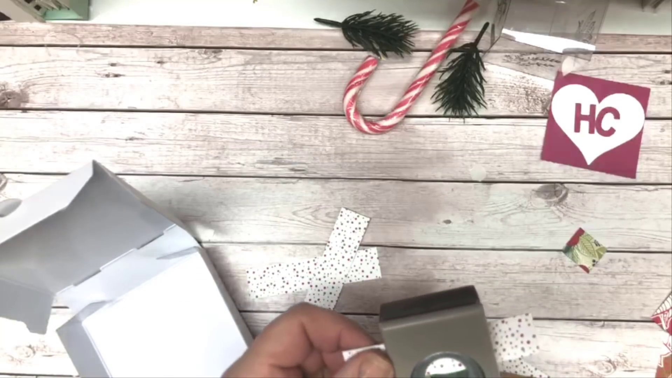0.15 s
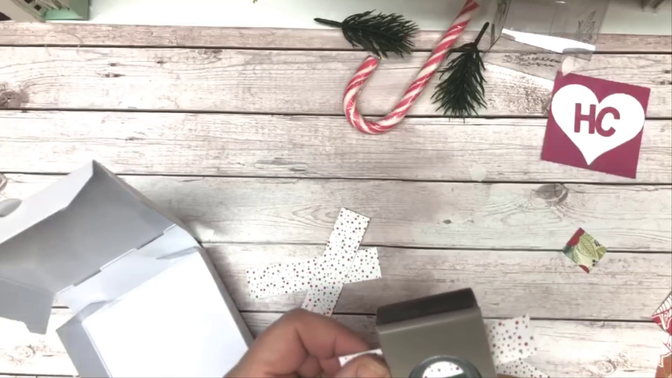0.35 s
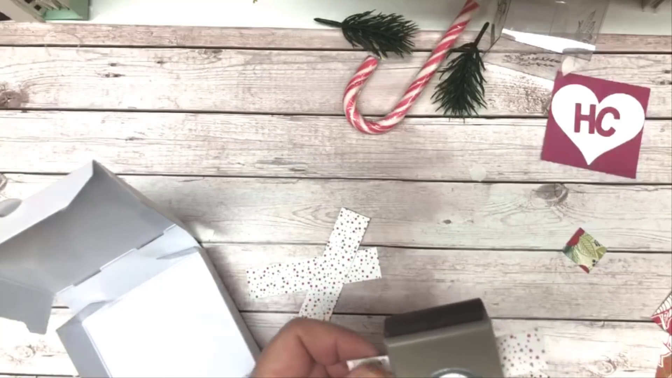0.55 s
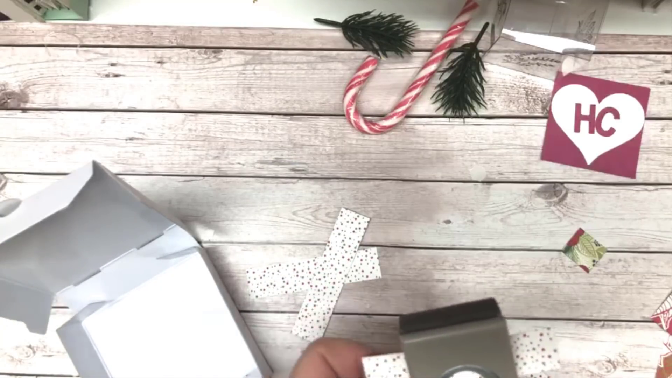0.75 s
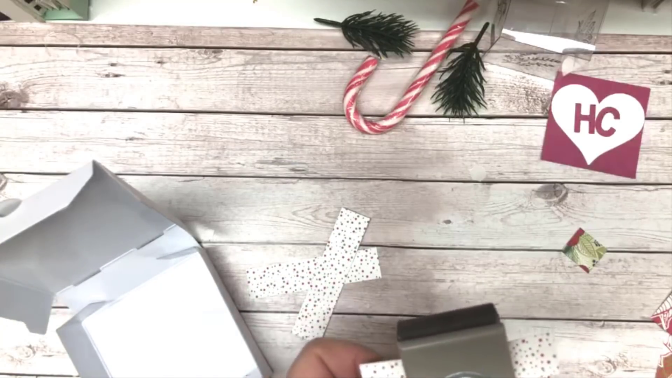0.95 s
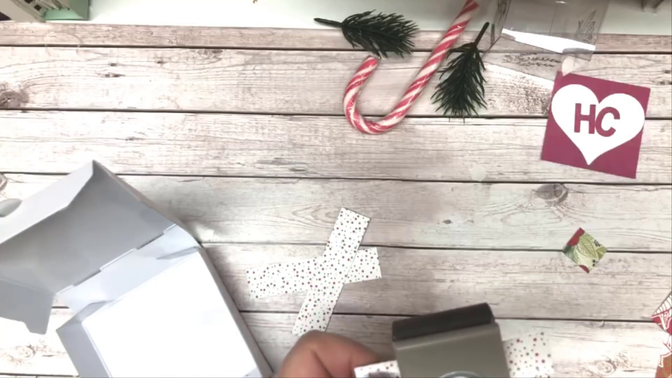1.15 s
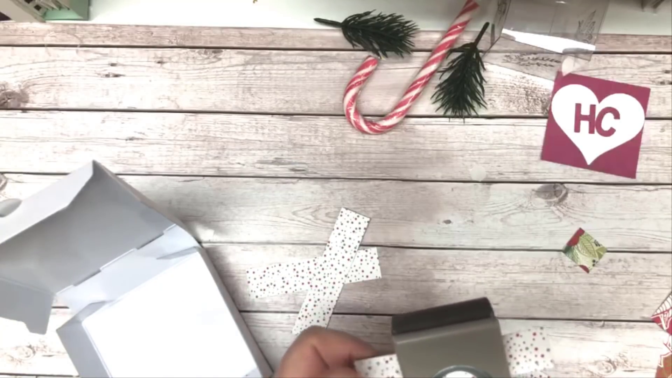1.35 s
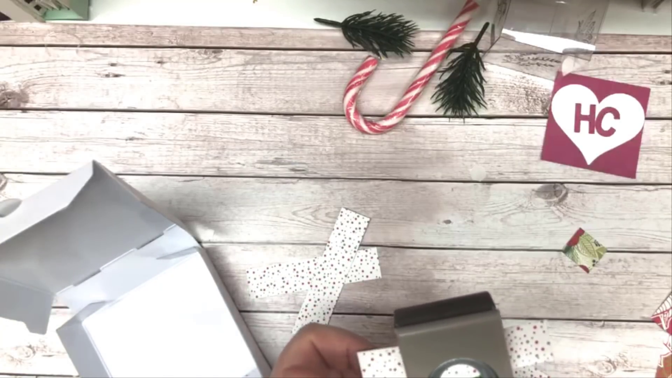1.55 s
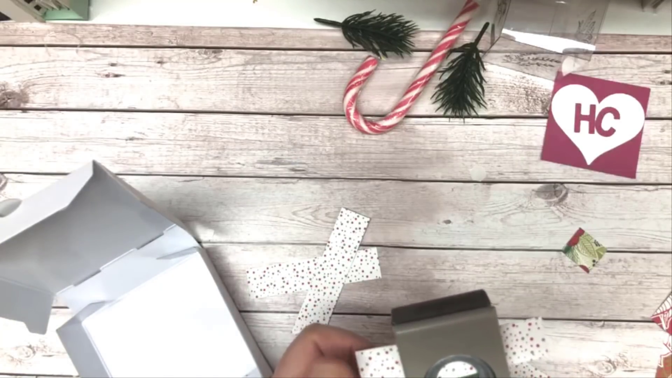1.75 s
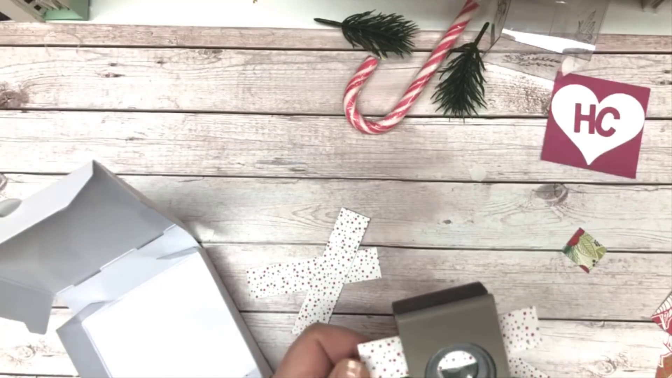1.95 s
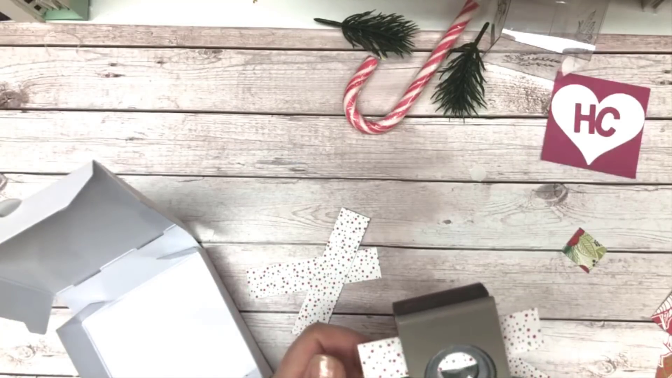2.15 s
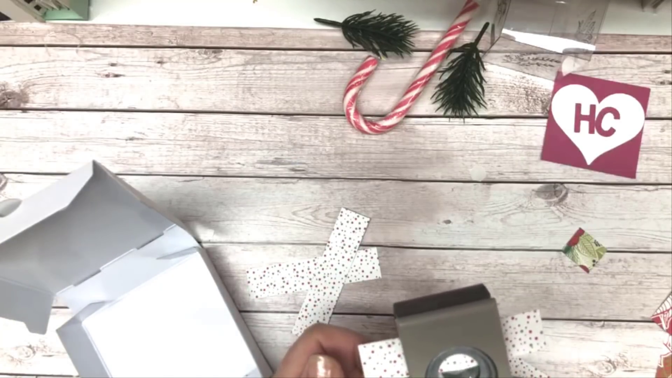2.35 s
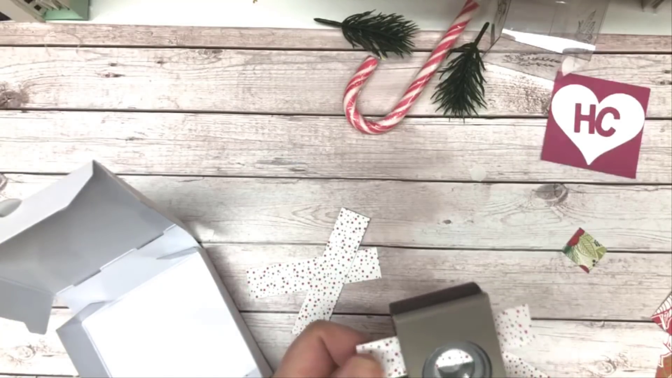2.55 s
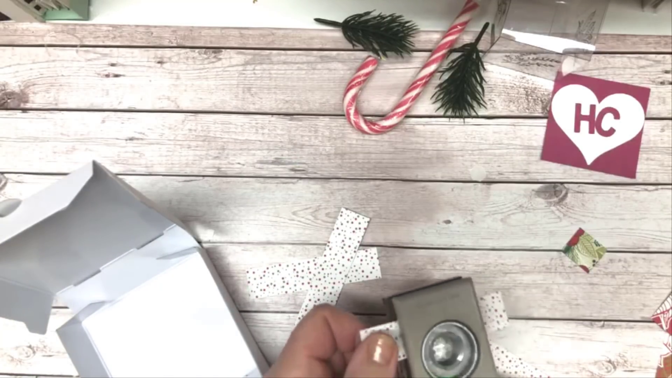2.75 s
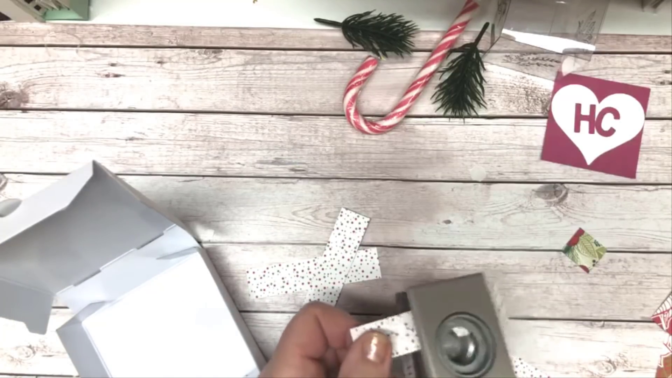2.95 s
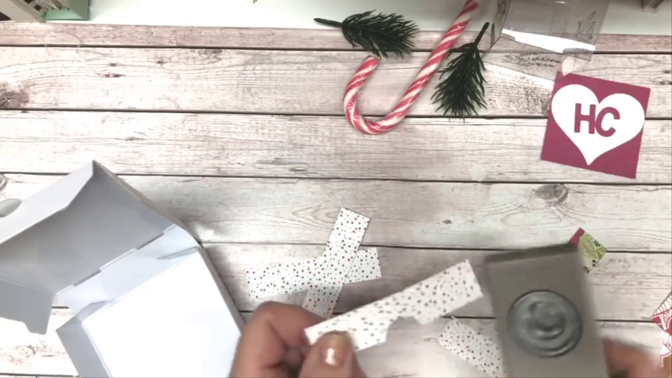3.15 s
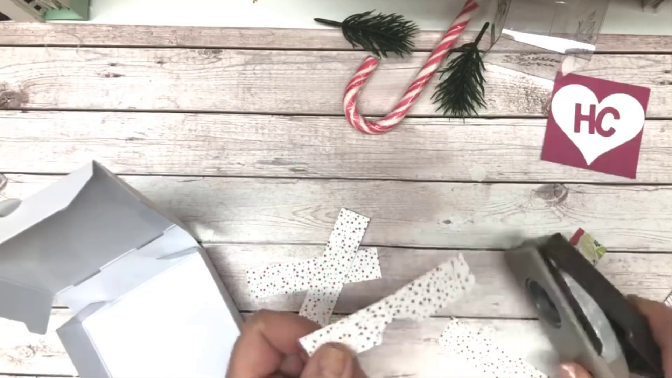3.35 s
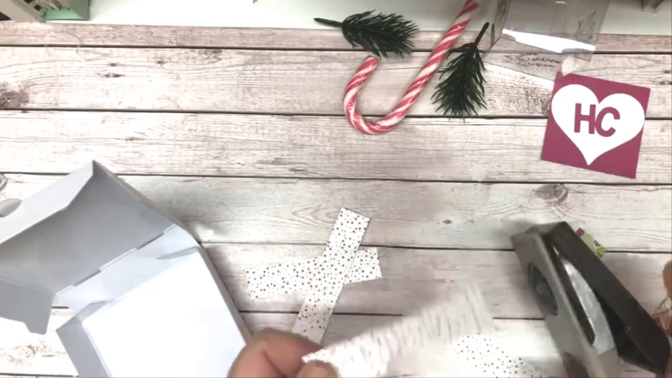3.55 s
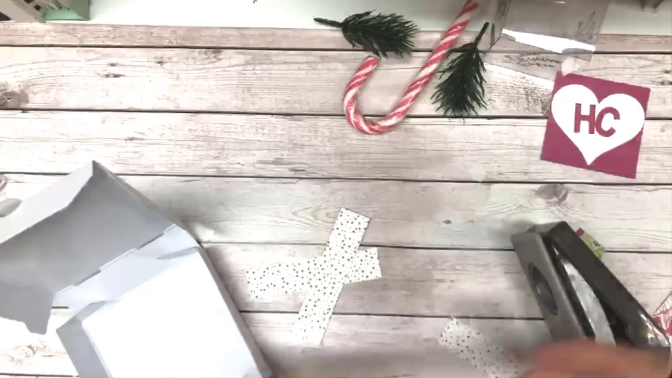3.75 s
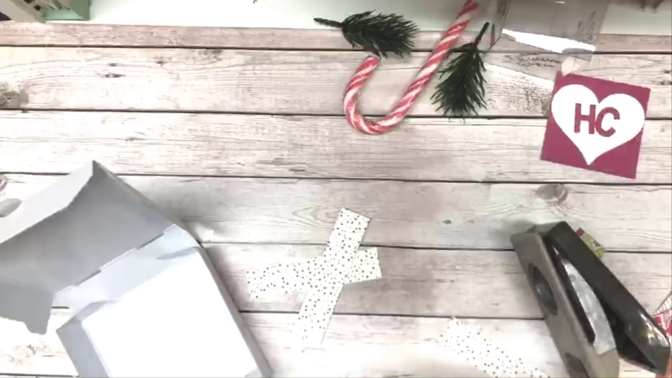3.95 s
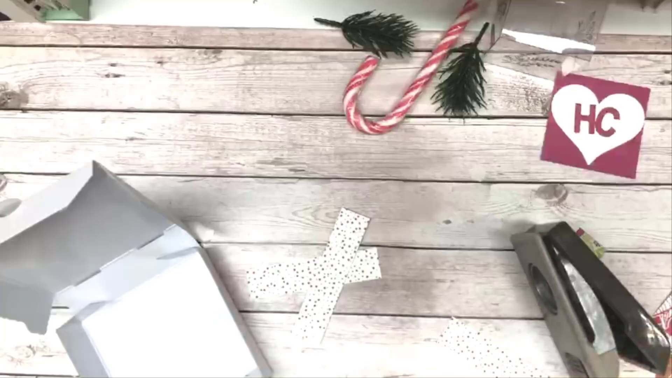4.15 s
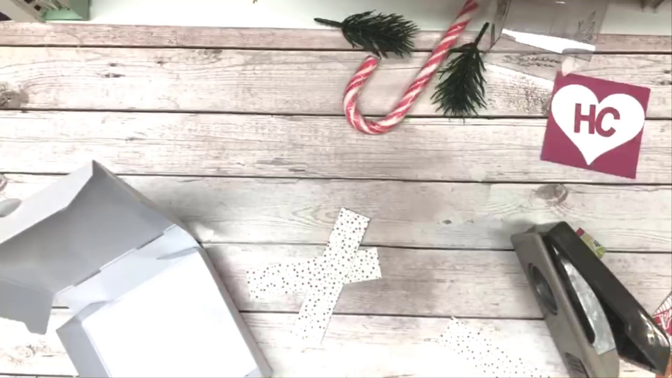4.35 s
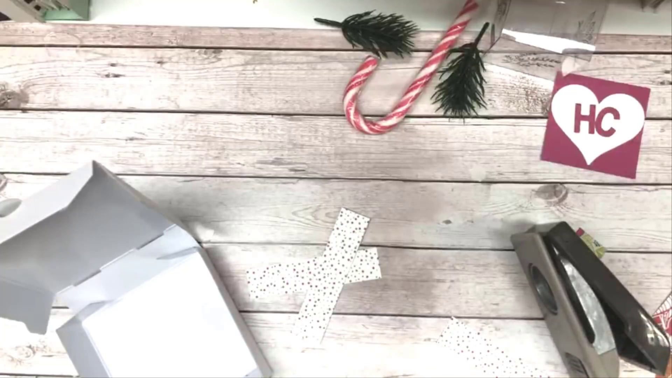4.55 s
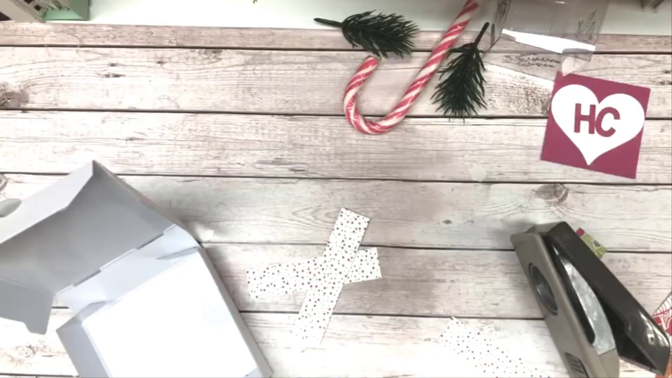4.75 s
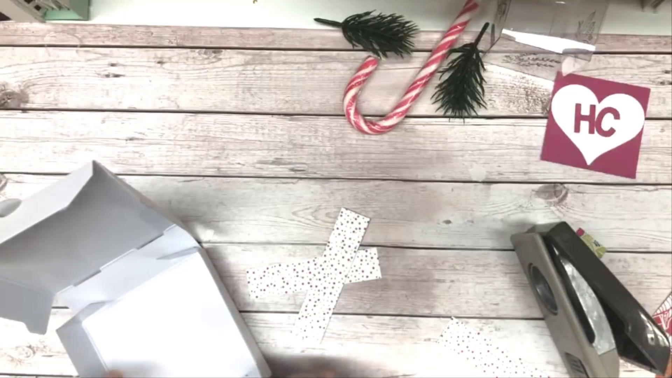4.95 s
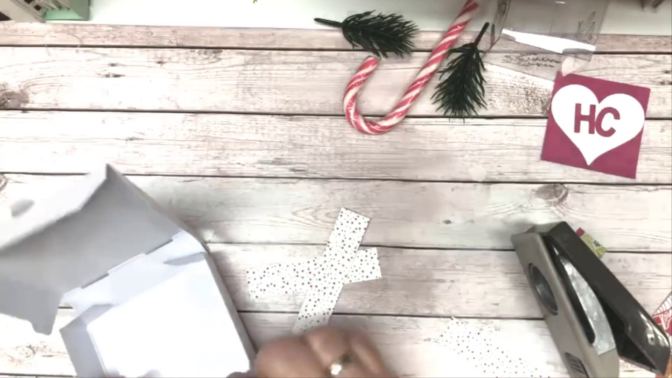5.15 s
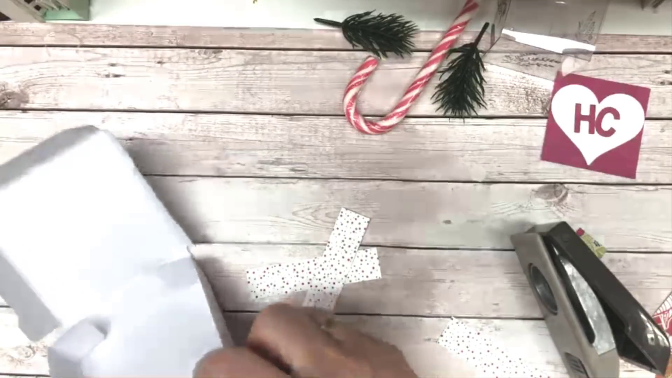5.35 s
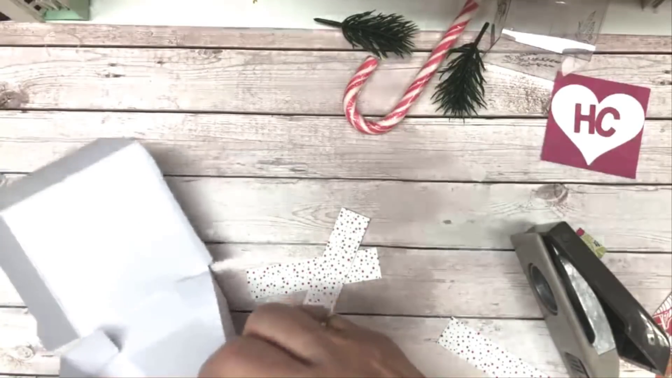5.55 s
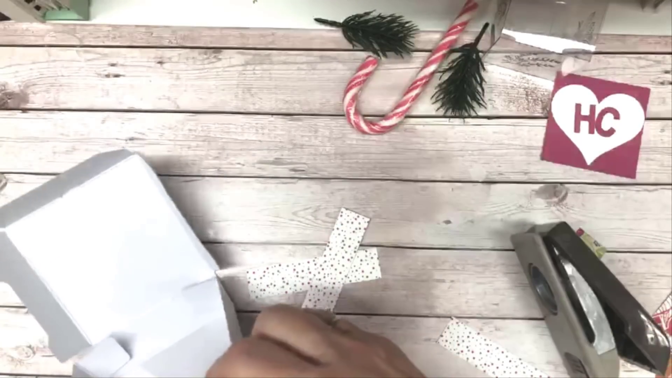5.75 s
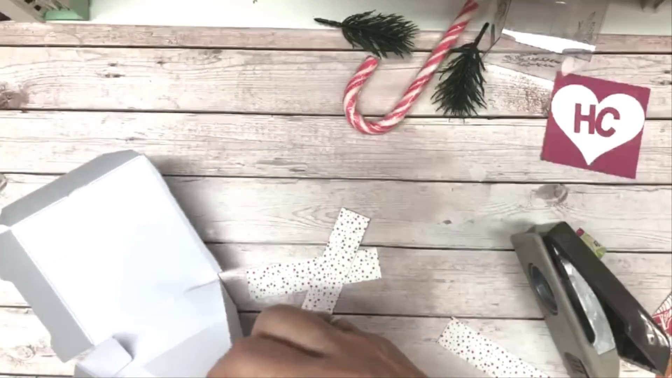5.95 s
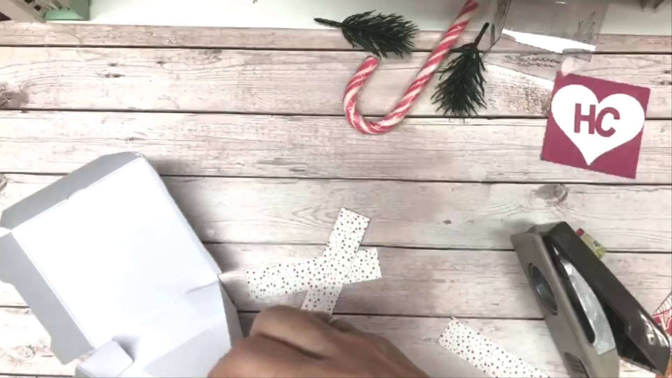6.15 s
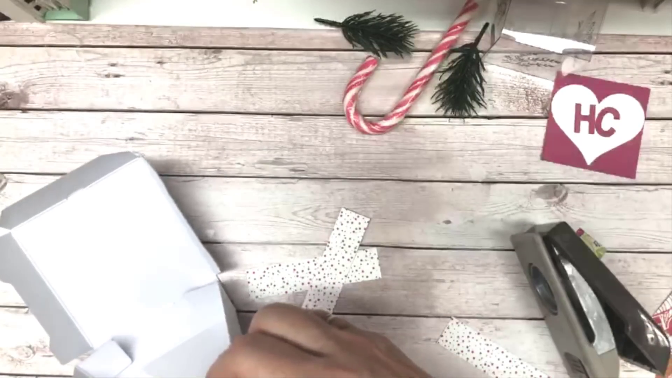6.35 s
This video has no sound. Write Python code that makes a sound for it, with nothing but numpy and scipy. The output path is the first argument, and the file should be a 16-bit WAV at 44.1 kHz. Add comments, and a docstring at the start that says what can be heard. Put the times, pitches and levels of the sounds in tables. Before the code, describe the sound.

Close mono microphone with automatic gain, small room. Low rumble and light hiss, tiny ticks of paper in a metal slot, then a punch clacks, crunches sharply and springs back with brief rattling. A strip is tugged out with dry rasps, and the tool thuds onto a wooden table. Afterwards come quiet fingertip taps, paper brushes and a short cardboard scrape fading into gentle sliding.

```python
"""A craft table in a small room: a hand-held lever punch cuts a paper strip and a cardboard box is moved.
The strip is nudged into the slot, the spring pings, the die bites, snaps through and springs back.
The strip is pulled out, the punch is put down, and the box is slid and turned by hand.
Blows ring decaying modes and noise bursts; rubbing is filtered noise with random slips.
The snap ducks an automatic gain, which creeps back up."""
import sys
import numpy as np
from scipy import signal
from scipy.fft import rfft, irfft
from scipy.io import wavfile
from scipy.ndimage import uniform_filter1d

SR = 44100
rng = np.random.default_rng(int(sys.argv[2]) if len(sys.argv) > 2 else 0)


def store_pcm(level_fs):
    """Save levels as 16-bit WAV."""
    pcm = np.round(np.clip(level_fs, -1, 1) * 32767).astype(np.int16)
    wavfile.write(sys.argv[1], SR, np.atleast_2d(pcm).T)


N = 286560
T_S = np.arange(N) / SR
AGE_S = T_S[:SR // 2]  # time since a blow

# All levels are relative. Spectra give density per Hz; filters are scaled to unit energy.
# Contacts in the punch and ticks of the paper strip:
# (time [s], hollow knock [dB], knock pitch [Hz], frame clack [dB], sharp tick [dB])
PUNCH_AND_STRIP_CONTACTS = [ (0.0205, -57, 1580, -64, -78), (0.605, -49, 1630, -53, -70),
                            (0.622, -76, 1720, -68, -51), (0.654, -59, 1910, -52, -68),
                            (1.1155, -53, 1670, -60, -82), (1.333, -87, 1700, -79, -57.5),
                            (1.501, -80, 1700, -59, -64), (1.8515, -50, 1820, -60.5, -64),
                            (1.8896, -54.5, 1680, -52, -80), (2.128, -36, 1680, -44.5, -68),
                            (2.132, -16, 1685, -33, -39), (2.626, -49.5, 1700, -72, -70),
                            (2.6442, -14, 1670, -26, -21), (2.6481, -21, 1680, -27, -44),
                            (2.6511, -17.5, 1630, -18.5, -32), (2.695, -28, 1430, -49, -53),
                            (2.702, -33, 1444, -48.5, -49), (2.7745, -30.5, 1540, -46, -54),
                            (2.7929, -16.5, 1382, -28, -25.5), (2.797, -41, 1236, -15, -30.5),
                            (2.944, -49, 1740, -49, -67), (2.98, -34.5, 1660, -38, -58),
                            (2.989, -46, 1750, -42, -39), (3.0197, -41.5, 1780, -39.5, -52),
                            (3.064, -51, 1750, -53, -61), (3.1195, -46.5, 1655, -69, -59),
                            (3.2326, -36.5, 1060, -27.5, -53)]
CLACK_T60_S, TICK_T60_S = 0.026, 0.01
KNOCK_SWELL_S = 0.0016
OVERTONE_RATIO, OVERTONE_DB = 1.6, -19  # second mode of the shell
# Punch frame: (frequency [Hz], level [dB], t60 [s])
FRAME_MODES = [(640, -4, .028), (1100, -4, .022), (1400, -8, .035), (1570, -11, .04), (1800, -6, .04),
               (2090, -10, .03), (2730, -8, .035), (3700, -14, .018), (4310, -9, .024), (4630, -11, .02),
               (5260, -7, .015), (5420, -7, .015), (5860, -12, .016), (6900, -17, .015)]
# Noise of a frame clack: (frequency [Hz], density [dB])
CLACK_SPECTRUM = [(100, -18), (350, -9), (600, -2), (850, -5), (1150, 2), (2600, 1), (3200, -3), (4400, -4),
                  (5400, -1), (7500, -14), (15500, -22)]
# Noise of a sharp tick: (frequency [Hz], density [dB])
TICK_SPECTRUM = [(100, -1), (700, 1), (3000, -2), (6000, -5), (8500, -11), (11500, -7), (14500, -3),
                 (16000, -6)]
# Spring slipping on its seat: (time [s], level [dB])
SPRING_SLIPS = [(1.8512, -51), (2.1325, -71), (2.6145, -66), (2.625, -61.5)]
# Spring: (frequency [Hz], level [dB], t60 [s])
SPRING_MODES = [(1640, -9, .05), (1960, -2, .06), (2595, 4, .05), (3800, -12, .06), (4323, -5, .085),
                (5066, -1, .22), (7111, -19, .1)]
# Lever hitting its stop: (time [s], level [dB])
LEVER_HITS = [(2.7972, -23), (3.2316, -34.5)]
# Lever: (frequency [Hz], level [dB], t60 [s])
LEVER_MODES = [(570, -15, .025), (980, -9, .03), (1265, 0, .055), (2449, -1, .035), (3461, -8, .03),
               (3984, -11, .03), (4700, -9, .02), (5582, -13, .02)]
# Squeezes that make the hinge creak: (peak time [s], rise [s], fall [s], level [dB])
HINGE_SQUEEZES = [(2.03, .1, .05, -77.5), (2.12, .06, .03, -71.5), (2.632, .025, .03, -59),
                  (2.965, 0.017, 0.021, -47)]
# Hinge creak: (frequency [Hz], density [dB])
HINGE_SPECTRUM = [(800, -30), (1700, -13), (2250, -19), (2620, 0), (3000, -20), (4400, -21), (9000, -38)]
# Loose parts rattling: (peak time [s], rise [s], fall [s], level [dB])
RATTLE_SPELLS = [(2.66, 0.011, 0.056, -47.5), (2.693, 0.016, 0.052, -46), (2.78, .05, 0.0155, -50.5),
                 (2.965, 0.022, 0.03, -55.5), (3.52, 0.11, 0.076, -59.5), (3.57, 0.018, 0.022, -53)]
RATTLE_PER_S, RATTLE_KNOCK_DB, RATTLE_KNOCK_HZ = 590, 2, 1520

# Strip sliding over the fingers as it is fed in: (peak time [s], rise [s], fall [s], level [dB])
STRIP_FEEDS = [(.56, 0.29, 0.27, -71), (1.22, 0.31, 0.42, -72)]
# Nudges of the strip in the slot: (peak time [s], rise [s], fall [s], level [dB])
STRIP_NUDGES = [(.05, .06, 0.065, -78), (.608, 0.026, 0.025, -57), (.94, 0.15, 0.19, -74),
                (1.11, 0.027, 0.044, -65.5), (1.27, 0.08, 0.078, -78), (1.49, 0.044, 0.065, -76)]
# Tugs that draw the strip out: (peak time [s], rise [s], fall [s], level [dB])
STRIP_TUGS = [(2.98, 0.093, 0.23, -59.5), (3.115, 0.029, 0.082, -59.5), (3.21, 0.052, 0.11, -56.5),
              (3.31, 0.042, 0.044, -69.5)]
TUG_SHELL_DB, TUG_EDGE_DB = -4, -7.5  # shell and paper edge, against the strip
# Strip on the fingers: (frequency [Hz], density [dB])
FEED_SPECTRUM = [(2000, -6.5), (4500, -4.5), (7000, -2.5), (9500, -5.5), (15000, -17.5)]
# Strip in the slot: (frequency [Hz], density [dB])
SLOT_SPECTRUM = [(500, -57), (1200, -50), (1700, 15), (2200, -15), (2700, 3.5), (3400, -13), (12000, -14)]
# Strip drawn free: (frequency [Hz], density [dB])
DRAWN_SPECTRUM = [(300, -18), (1100, -8), (1700, 1), (2200, -6), (2700, -3), (3600, -11), (5600, -10),
                  (8500, -21), (15000, -23)]

# Punch landing and rocking: (time [s], table thud [dB], hollow knock [dB], frame clack [dB])
PUNCH_LANDINGS = [(3.4284, -35.5, -20.5, -25), (3.4465, -46, -30.5, -33.5), (3.5217, -53.5, -44, -42.5),
                  (3.538, -60, -44, -48), (3.551, -57.5, -54, -63), (3.5659, -63, -38.5, -52)]
LANDING_KNOCK_HZ, FEET_TOP_HZ = 1650, 3800
# Table top: (frequency [Hz], level [dB], t60 [s])
TABLE_MODES = [(70, -32, 0.104), (121, -14, 0.097), (157, 5.5, 0.089), (220, -2, 0.089),
               (292.6, -9.5, 0.097), (360, -15, 0.063), (496, -16, 0.078), (773, -14.5, 0.044)]
# Dull bump of the whole board: (frequency [Hz], density [dB])
BUMP_SPECTRUM = [(70, -3.5), (150, -1), (260, 2), (400, 7.5), (550, 6), (900, -1), (1500, -28.5)]
# Fingers and card touching down: (time [s], tap [dB], top of the tap [Hz], table thud [dB])
TABLE_TAPS = [(3.964, -47.5, 4020, -77), (3.9944, -52, 5030, -60.5), (4.1486, -42.5, 6000, -71),
              (4.3481, -55, 12000, -81), (4.3692, -52.5, 6940, -79), (4.5507, -51, 4500, -78.5),
              (4.6102, -53, 5970, -63), (4.624, -45, 5000, -56), (4.814, -45, 7000, -58),
              (4.8794, -50, 4520, -63.5), (4.9217, -47, 4470, -69), (5.0927, -44.5, 8950, -60),
              (5.1188, -45, 4000, -60.5), (5.206, -42, 5000, -70), (5.269, -45.5, 2500, -68),
              (5.4117, -46, 2540, -56), (5.7563, -53.5, 10100, -80)]
# Tap on card: (frequency [Hz], density [dB])
TAP_SPECTRUM = [(150, 10), (400, -16), (800, 4), (1200, 4), (2000, 6), (2800, 0), (5000, 1.5), (7500, -6),
                (15000, 5.5)]
# Hand shifting on the table as it grips: (peak time [s], rise [s], fall [s], level [dB])
HAND_GRIPS = [(1.97, .25, .5, -74)]

# Box speed, as a glide level: (time [s], level [dB])
BOX_SPEED = [(3.85, -79), (4.03, -78.5), (4.37, -81.5), (4.72, -79.5), (4.89, -74), (5.13, -80.5),
             (5.29, -67.5), (5.34, -67), (5.81, -82.5), (5.97, -79), (6.17, -83.5), (6.36, -84.5),
             (6.49, -102)]
GLIDE_DB, DRAG_DB = -0.5, -26.5
DRAG_EXPONENT = 0.75  # drag grows more slowly than glide
CRACKLE_PER_S, CRACKLE_DB = 36, 11  # stray ticks of the moving card
# Shoves of the box: (peak time [s], rise [s], fall [s], scrape [dB], drag on the table [dB])
BOX_SHOVES = [(4.02, .15, 0.34, -76, -87), (4.99, 0.1, 0.13, -98, -72), (5.09, 0.11, 0.085, -66.5, -76),
              (5.205, 0.087, 0.1, -59.5, -64), (5.381, 0.026, 0.016, -45.5, -85),
              (5.42, 0.021, 0.038, -56, -59.5), (5.69, 0.11, 0.1, -85, -71.5), (5.87, .03, .06, -76, -70),
              (6.355, .02, .05, -73.5, -85)]
# Surges as the turning box catches and glides on: (peak time [s], rise [s], fall [s], level [dB])
BOX_SURGES = [(4.58, 0.11, 0.21, -85), (5.445, .05, 0.043, -63), (5.515, 0.035, 0.024, -68.5),
              (5.63, 0.026, .05, -72), (5.705, .03, .03, -67), (5.765, 0.027, 0.045, -65.5),
              (5.82, 0.035, .035, -68), (5.915, 0.058, 0.045, -69.5), (6.3, 0.22, .12, -79.5)]
# Fingertips brushing paper: (peak time [s], rise [s], fall [s], level [dB])
FINGER_BRUSHES = [(4.16, 0.033, 0.059, -68), (4.385, 0.017, 0.047, -61), (4.455, .02, 0.02, -67),
                  (4.78, 0.12, 0.065, -63.5), (5.09, .04, 0.1, -65), (5.44, 0.038, 0.079, -65),
                  (5.51, 0.072, 0.027, -62), (5.635, 0.054, 0.034, -62.5), (5.765, 0.025, 0.077, -68)]
# Card scraped: (frequency [Hz], density [dB])
SCRAPE_SPECTRUM = [(290, -39), (500, -5), (853, -6), (972, -0.5), (1080, -8.5), (1440, 2), (2520, -7),
                   (2960, 0), (3370, -8), (4690, -4), (8130, -19), (14100, -21.5), (15800, -32)]
# Dull rub on the table: (frequency [Hz], density [dB])
DRAG_SPECTRUM = [(120, -41.5), (200, -3.5), (270, 4.5), (400, -8), (520, -7), (750, -8), (1200, -26.5)]
# Card gliding on its edge: (frequency [Hz], density [dB])
GLIDE_SPECTRUM = [(500, -20.5), (1000, -1.5), (1300, -2), (1650, -5.5), (2090, 6.5), (2500, -7),
                  (2950, -4.5), (4500, -8.5), (5600, -5.5), (6500, -6.5), (7600, -27), (12000, -11.5),
                  (15800, -34.5)]
# Paper brushed: (frequency [Hz], density [dB])
BRUSH_SPECTRUM = [(1000, -17), (3000, -5), (5200, -3), (8500, -11.5), (11000, -5.5), (13700, -4.5),
                  (15800, -2.5)]

# Room tail: (nominal band frequency [Hz], level [dB], t60 [s])
ROOM_BANDS = [(150, -14, 0.45), (595, -13.5, 0.31), (1600, -22, 0.35), (3880, -15.5, 0.29),
              (8100, -21, .28), (14000, -15.5, 0.24)]
# Room rumble in time: (time [s], level [dB])
RUMBLE_LEVEL = [(0, -54.5), (.8, -59.5), (1.2, -59), (2.4, -57.5), (3.35, -64), (4.1, -57), (4.6, -66),
                (5.4, -63.5), (6.05, -59.5), (6.5, -61)]
# Rumble: (frequency [Hz], density [dB])
RUMBLE_SPECTRUM = [(12, 4.5), (30, 4.5), (45, -7), (85, -5.5), (125, -18.5), (180, -23), (300, -30.5),
                   (600, -45)]
# Hiss: (frequency [Hz], density [dB])
HISS_SPECTRUM = [(100, 7.5), (300, 7), (600, 6), (1200, 3), (2000, 0), (2900, -2.5), (4500, -3), (8000, -4),
                 (15000, -5)]
HISS_DB, HUM_HZ, HUM_DB = -74.5, 202, -78.5
# Automatic gain and upper band limit
DUCK_ABOVE_DB, DUCK_SMOOTHING_S, RECOVER_DB_PER_S = -32.5, 0.04, 3.66
CUTOFF_HZ = 15450


def from_db(db):
    """Decibels to gain."""
    return 10 ** (np.asarray(db) / 20)


def rms_one(x):
    """Scale to unit power."""
    return x / np.sqrt(np.mean(x ** 2) + 1e-20)


def level(rows):
    """Gain in time from (time [s], level [dB]) points, silent before the first."""
    time_s, db = np.transpose(rows)
    return from_db(np.interp(T_S, time_s, db, left=-np.inf))


def strokes(rows, axis=3):
    """Hand moves: each swells to a rounded peak and eases off, 20 dB down at the ends of rise and fall."""
    gain = 0
    for row in rows:
        peak_s, rise_s, fall_s = row[:3]
        away = np.abs(T_S - peak_s) / np.where(T_S < peak_s, rise_s, fall_s)
        gain = gain + from_db(row[axis] - 20 * np.minimum(away, 10) ** 1.2)
    return gain


def add(out, time_s, sound):
    """Mix a sound in at a time."""
    i = round(time_s * SR)
    out[i:i + len(sound)] += sound[:N - i]


def colour(x, spectrum):
    """Causal minimum-phase filter of unit energy with the given spectrum."""
    size = 2 ** 13
    hz, db = np.transpose(spectrum)
    bins_hz = np.fft.rfftfreq(size, 1 / SR)
    bins_db = np.interp(np.log(bins_hz + 1), np.log(hz), db)
    cepstrum = irfft(np.log(from_db(bins_db)))
    # Keeping the doubled causal half of the cepstrum gives minimum phase.
    response = irfft(np.exp(rfft(2 * cepstrum[:size // 2], size)))
    return signal.fftconvolve(x, response / np.linalg.norm(response))[:len(x)]


def soften(x, top_hz):
    """A soft contact lasts longer and so loses its treble: low-pass."""
    sos = signal.butter(2, min(top_hz, CUTOFF_HZ), fs=SR, output="sos")
    return signal.sosfilt(sos, x)


def ring(modes, scatter_db=0, together=False):
    """One blow on decaying modes of scattered strength; neighbours start in opposite or equal phase."""
    out = np.zeros(len(AGE_S))
    for k, (hz, db, t60_s) in enumerate(modes):
        sign = 1 if together else (-1) ** k
        decay = from_db(db + scatter_db * rng.normal() - 60 * AGE_S / t60_s)
        out += sign * decay * np.sin(2 * np.pi * hz * AGE_S)
    return out


def burst(spectrum, t60_s):
    """The crowd of short-lived modes in a hard contact, as quickly dying noise."""
    noise = rng.choice([-1, 1], len(AGE_S))
    return colour(noise * from_db(-60 * AGE_S / t60_s), spectrum)


def clicks(per_s):
    """Impulses of uneven size at random moments."""
    return (rng.random(N) < per_s / SR) * rng.standard_normal(N)


def friction(spectrum, slips_per_s, grain, flutter_db):
    """Fibres catch and let go: a smooth rush plus uneven slips, under a wavering pressure."""
    moments_s = np.arange(0, N / SR + 1, 0.012)
    waver = np.interp(T_S, moments_s, rng.standard_normal(len(moments_s)))
    pressure = from_db(flutter_db * waver)
    slips = rms_one(clicks(slips_per_s))
    rush = rng.standard_normal(N)
    return rms_one(colour(pressure * (rush + grain * slips), spectrum))


def knock(hz, swell_s):
    """The hollow shell swells, peaks at swell_s and is damped at once by the hand."""
    u = AGE_S / swell_s
    envelope = u * np.exp((1 - u ** 2) / 2)
    phase = 2 * np.pi * hz * AGE_S
    return envelope * (np.sin(phase) + from_db(OVERTONE_DB) * np.sin(OVERTONE_RATIO * phase))


def clack():
    """A hard blow rings the frame's main modes and a crowd of lesser ones."""
    main = from_db(-10) * ring(FRAME_MODES, scatter_db=1)
    lesser = from_db(-8) * burst(CLACK_SPECTRUM, CLACK_T60_S)
    return main + lesser


def punch_and_strip_contacts():
    """Each contact mixes hollow knock, frame clack and sharp tick, each at its own level."""
    out = np.zeros(N)
    for time_s, knock_db, hz, clack_db, tick_db in PUNCH_AND_STRIP_CONTACTS:
        tick = from_db(-5) * burst(TICK_SPECTRUM, TICK_T60_S)
        add(out, time_s, from_db(knock_db) * knock(hz, KNOCK_SWELL_S))
        add(out, time_s, from_db(clack_db) * clack())
        add(out, time_s, from_db(tick_db) * tick)
    return out


def linkage():
    """Spring and lever ring on their own modes; the hinge creaks by friction under each squeeze."""
    out = strokes(HINGE_SQUEEZES) * friction(HINGE_SPECTRUM, slips_per_s=400, grain=0.6, flutter_db=3.8)
    for time_s, db in SPRING_SLIPS:
        add(out, time_s, from_db(db) * ring(SPRING_MODES))
    for time_s, db in LEVER_HITS:
        add(out, time_s, from_db(db) * ring(LEVER_MODES))
    return out


def rattle():
    """Loose parts chatter at random against frame and shell."""
    touches = clicks(RATTLE_PER_S)
    frame = rms_one(signal.fftconvolve(touches, clack())[:N])
    shell = rms_one(signal.fftconvolve(touches, knock(RATTLE_KNOCK_HZ, KNOCK_SWELL_S))[:N])
    return strokes(RATTLE_SPELLS) * rms_one(frame + from_db(RATTLE_KNOCK_DB) * shell)


def strip():
    """Paper is fed in, rubs in the slot, sounding the shell, and is tugged out."""
    feed = friction(FEED_SPECTRUM, slips_per_s=540, grain=1.0, flutter_db=1.5)
    slot = friction(SLOT_SPECTRUM, slips_per_s=200, grain=1.2, flutter_db=2.8)
    drawn = friction(DRAWN_SPECTRUM, slips_per_s=280, grain=1.3, flutter_db=2.4)
    edge = friction(BRUSH_SPECTRUM, slips_per_s=900, grain=0.7, flutter_db=1.5)
    tug = rms_one(drawn + from_db(TUG_SHELL_DB) * slot + from_db(TUG_EDGE_DB) * edge)
    return strokes(STRIP_FEEDS) * feed + strokes(STRIP_NUDGES) * slot + strokes(STRIP_TUGS) * tug


def table():
    """The punch lands on its feet and rocks; fingers and card tap, duller when soft; a gripping hand rubs."""
    out = np.zeros(N)
    for time_s, thud_db, knock_db, clack_db in PUNCH_LANDINGS:
        board = ring(TABLE_MODES, scatter_db=3, together=True)
        thud = board + from_db(-11.5) * burst(BUMP_SPECTRUM, t60_s=0.13)
        add(out, time_s, from_db(thud_db) * thud)
        add(out, time_s, from_db(knock_db) * knock(LANDING_KNOCK_HZ, swell_s=0.0011))
        add(out, time_s, from_db(clack_db) * soften(clack(), FEET_TOP_HZ))
    for time_s, tap_db, top_hz, thud_db in TABLE_TAPS:
        add(out, time_s, from_db(tap_db) * soften(burst(TAP_SPECTRUM, t60_s=0.019), top_hz))
        add(out, time_s, from_db(thud_db) * burst(BUMP_SPECTRUM, t60_s=0.034))
    grip = friction(DRAG_SPECTRUM, slips_per_s=110, grain=0.46, flutter_db=-0.5)
    return out + strokes(HAND_GRIPS) * grip


def box():
    """The moving box glides on its edge, crackles and drags with a dull rub; fingers shove and brush it."""
    speed = level(BOX_SPEED)
    glide = friction(GLIDE_SPECTRUM, slips_per_s=500, grain=0.6, flutter_db=1.8)
    scrape = friction(SCRAPE_SPECTRUM, slips_per_s=450, grain=1.2, flutter_db=1.8)
    drag = friction(DRAG_SPECTRUM, slips_per_s=120, grain=0.8, flutter_db=2)
    brush = friction(BRUSH_SPECTRUM, slips_per_s=900, grain=0.7, flutter_db=1.5)
    crackle = signal.fftconvolve(speed * clicks(CRACKLE_PER_S), burst(SCRAPE_SPECTRUM, t60_s=0.007))[:N]
    glide_gain = from_db(GLIDE_DB) * speed + strokes(BOX_SURGES)
    drag_gain = from_db(DRAG_DB) * speed ** DRAG_EXPONENT + strokes(BOX_SHOVES, axis=4)
    sliding = glide_gain * glide + drag_gain * drag + from_db(CRACKLE_DB) * crackle
    return sliding + strokes(BOX_SHOVES) * scrape + strokes(FINGER_BRUSHES) * brush


def decaying(noise, db, t60_s):
    """Exponentially dying noise, normalised for its decay time."""
    return noise * from_db(db - 60 * AGE_S / t60_s) / np.sqrt(t60_s * SR / np.log(1e6))


def room(x, near_db, near_t60_s):
    """Quick reflections off the table and things on it, plus a tail that dies band by band."""
    centres_hz = np.array(ROOM_BANDS)[:, 0]
    edges_hz = [50, *np.sqrt(centres_hz[1:] * centres_hz[:-1]), CUTOFF_HZ]
    response = decaying(rng.standard_normal(len(AGE_S)), near_db, near_t60_s)
    for (_, db, t60_s), low_hz, high_hz in zip(ROOM_BANDS, edges_hz, edges_hz[1:]):
        sos = signal.butter(2, [low_hz, high_hz], "band", fs=SR, output="sos")
        band = signal.sosfilt(sos, rng.standard_normal(len(AGE_S)))
        response = response + decaying(band, db, t60_s)
    delayed = np.pad(response, (round(0.004 * SR), 0))
    return signal.fftconvolve(x, delayed)[:N]


def background():
    """Low rumble of drifting level, steady hiss and a faint sine hum."""
    rumble = level(RUMBLE_LEVEL) * rms_one(colour(rng.standard_normal(N), RUMBLE_SPECTRUM))
    hiss = from_db(HISS_DB) * rms_one(colour(rng.standard_normal(N), HISS_SPECTRUM))
    hum = from_db(HUM_DB) * np.sin(2 * np.pi * HUM_HZ * T_S)
    return rumble + hiss + hum


def scene():
    """Sources at the table, their reflections and the background, as one channel."""
    direct = punch_and_strip_contacts() + linkage() + rattle() + strip() + table() + box()
    return (direct + room(direct, near_db=-16, near_t60_s=0.041) + background())[None]


def record(dry):
    """Loud snaps turn the gain down and it recovers slowly; the top is cut steeply."""
    loudness_db = 10 * np.log10(uniform_filter1d(dry[0] ** 2, size=1323) + 1e-12)  # 30 ms window
    excess_db = np.maximum(loudness_db - DUCK_ABOVE_DB, 0)
    recovery_db = RECOVER_DB_PER_S * T_S
    held_db = np.maximum.accumulate(excess_db + recovery_db) - recovery_db
    pole = np.exp(-1 / (DUCK_SMOOTHING_S * SR))
    duck_db = signal.lfilter([1 - pole], [1, -pole], held_db)
    ducked = dry * from_db(-duck_db)
    return signal.sosfilt(signal.ellip(10, 0.1, 80, CUTOFF_HZ, fs=SR, output="sos"), ducked)


dry = scene()
out = record(dry)
store_pcm(out)
```